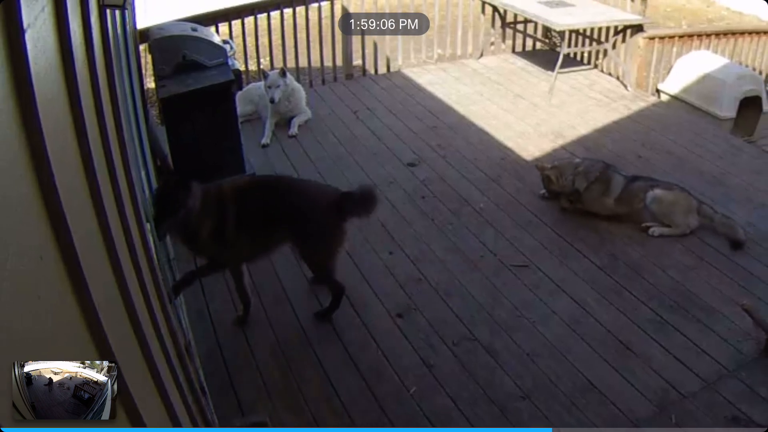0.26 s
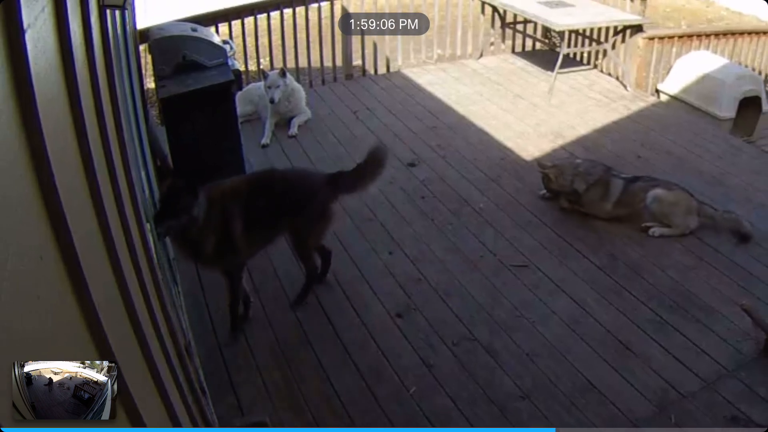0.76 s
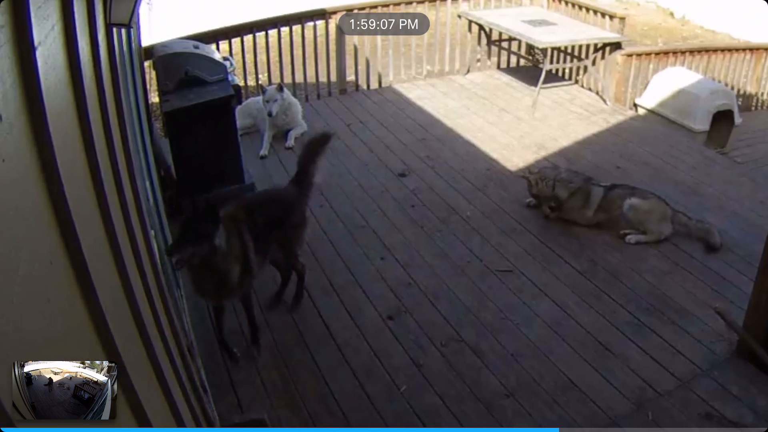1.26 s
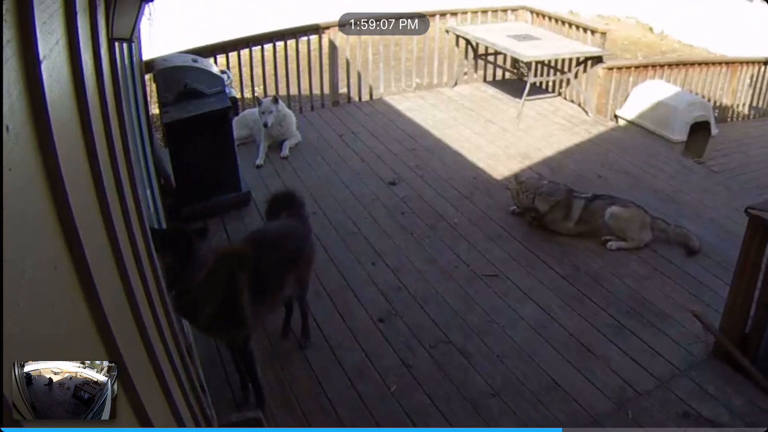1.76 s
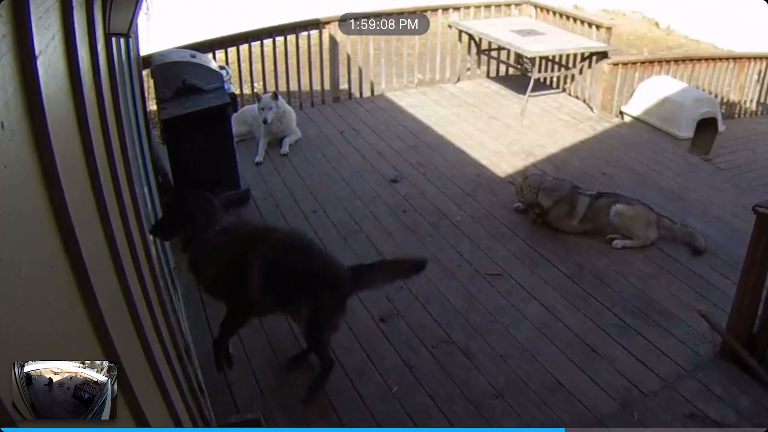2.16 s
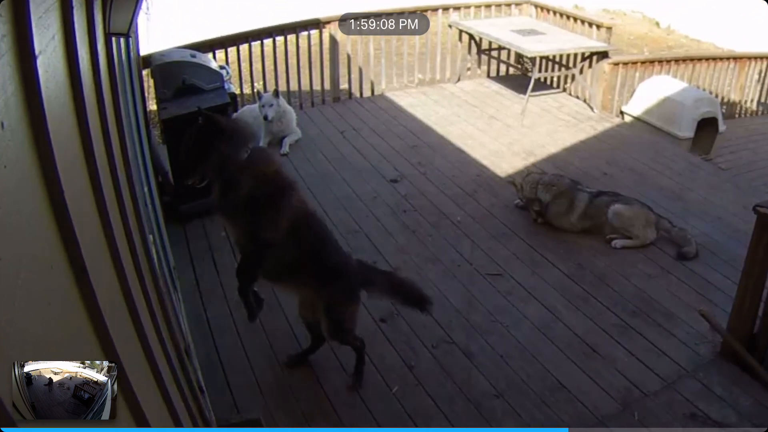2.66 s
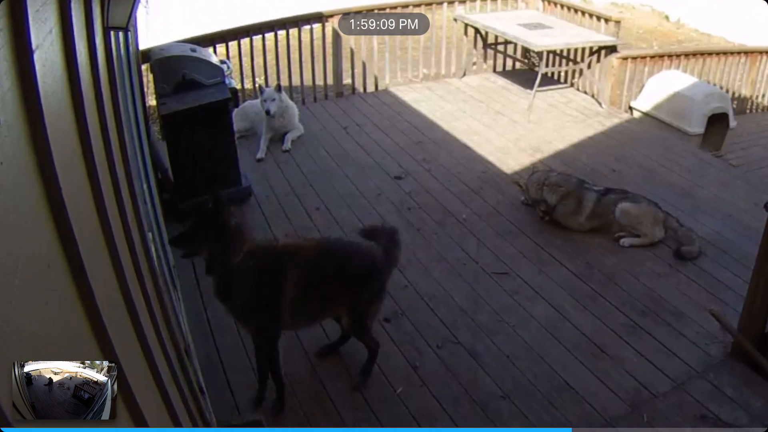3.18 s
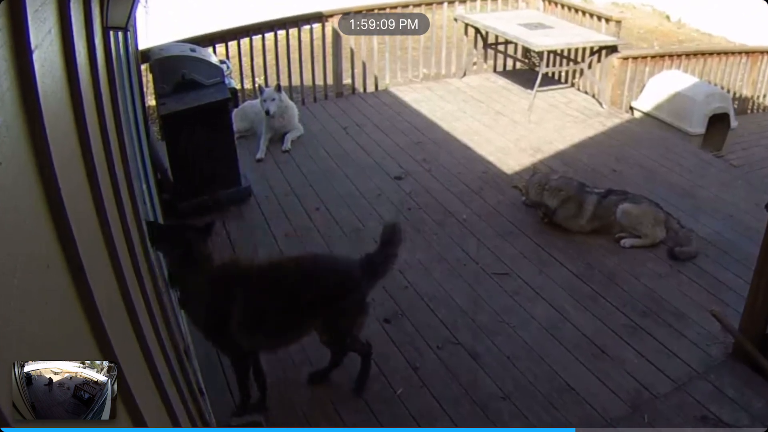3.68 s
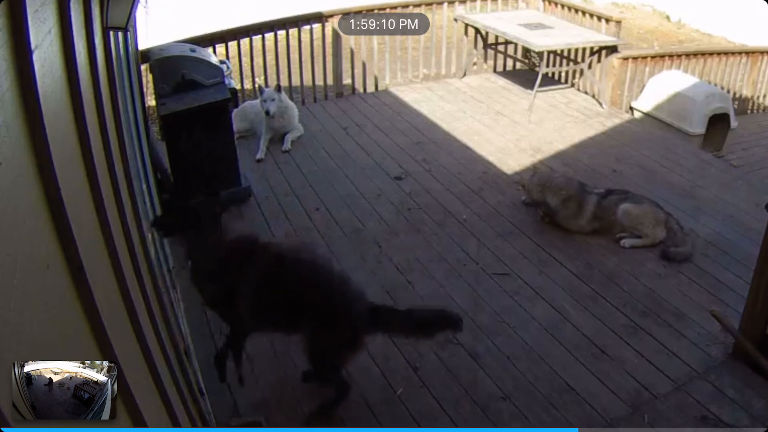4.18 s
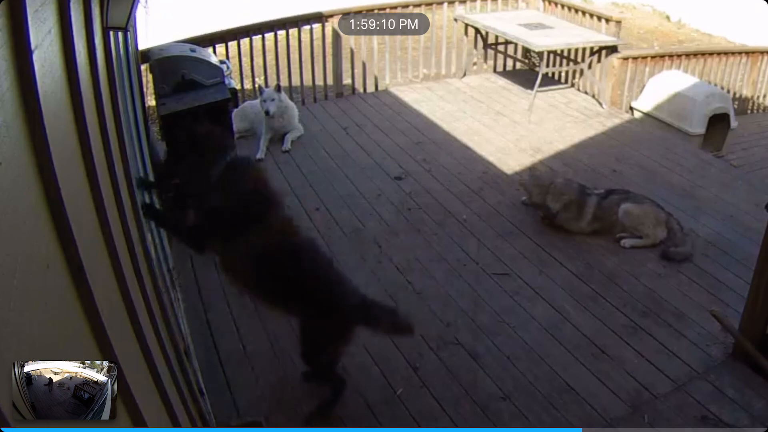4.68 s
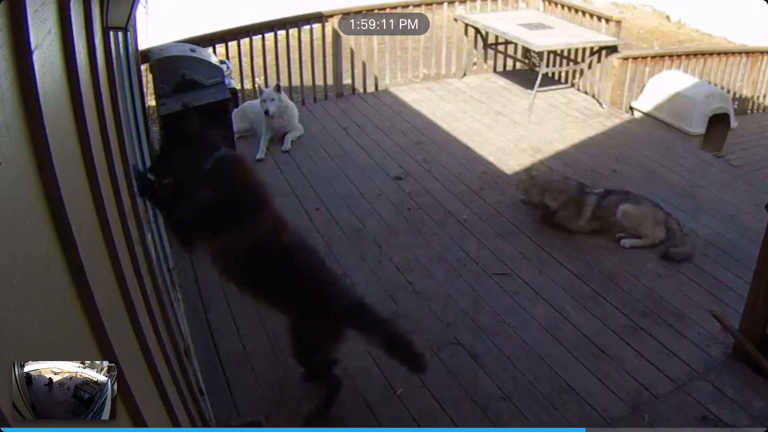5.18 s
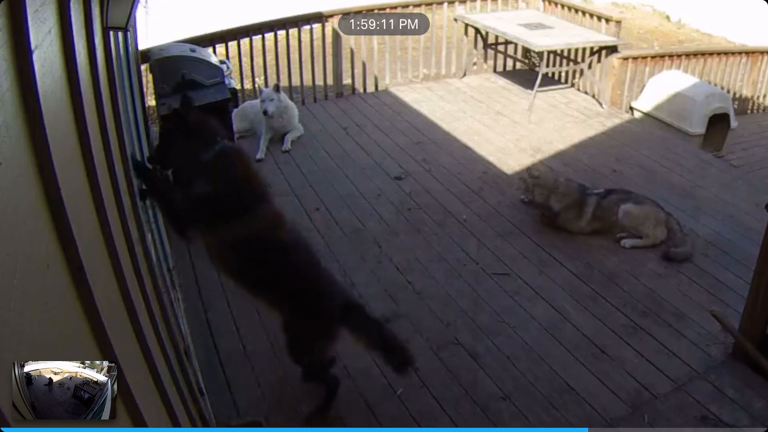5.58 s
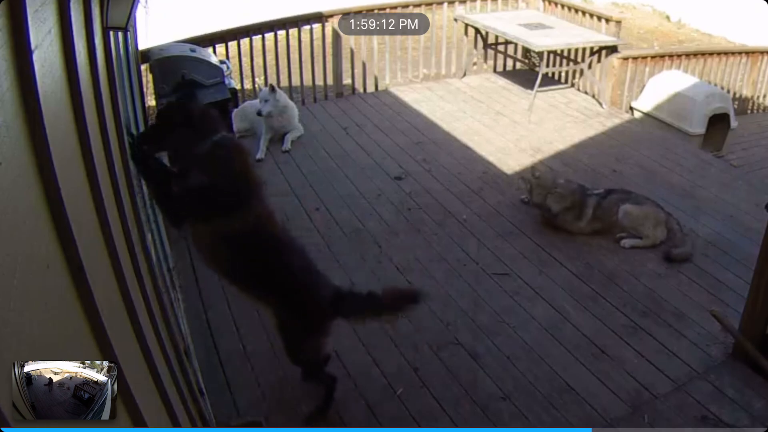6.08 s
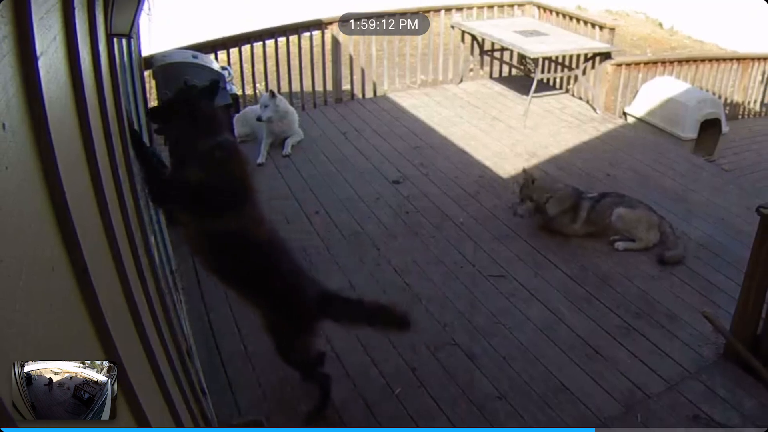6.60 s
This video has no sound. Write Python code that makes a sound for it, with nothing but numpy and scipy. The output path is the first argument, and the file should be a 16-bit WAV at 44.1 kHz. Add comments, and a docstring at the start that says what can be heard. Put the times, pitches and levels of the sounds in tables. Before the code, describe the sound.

Claws strike glass and frame at once with a knock, then lighter footfalls patter on hollow boards. A dense, uneven run of heavy thumps and clicks follows, a short pause, then repeated ringing scrapes on the pane with fewer thuds and one tiny rising squeak. Quiet open air lies behind, heard through a small outdoor microphone with muffled treble.

```python
"""Paws of a dog jumping at a glass sliding door: short rumbling thumps from modes of deck boards and frame.
Claws tick and skid on the pane: grains of friction drive its rings, a knock, a door thud and brief squeaks.
Once a short rising tone squeaks, perhaps a pad slipping on glass.
A faint outdoor hush of coloured noise lies below; a small wall-mounted microphone dulls the top."""
import sys
import numpy as np
from scipy import signal
from scipy.fft import rfft, irfft
from scipy.io import wavfile

SR = 44100
rng = np.random.default_rng(int(sys.argv[2]) if len(sys.argv) > 2 else 0)


def output_pcm(signal):
    """Save a mono or channel-first signal as 16-bit PCM at the path in sys.argv[1].

    Samples are clipped to [-1, 1] before scaling.
    """
    pcm = np.clip(np.atleast_2d(signal).T, -1, 1) * 32767
    wavfile.write(sys.argv[1], SR, np.round(pcm).astype(np.int16))


N = 301644   # samples

# claw strokes on pane and frame: t/s, drive/dB, upper ring/dB re drive, knock/dB re drive
CLAW_STROKES = [(.12, -26.5, -15.5, -7), (.2095, -34, -12, -11.5), (.264, -42.5, -17, -12),
                (0.352, -43, -5.5, -13), (.519, -33.5, -20.5, -19.5), (.894, -48.5, -22, -17),
                (1.098, -38.5, -18, -29), (1.2, -46, -20, -35), (1.222, -39.5, -16.5, -28),
                (1.234, -50, -30, -23), (1.538, -44.5, -17.5, -17.5), (1.7613, -47, -16, -12.5),
                (1.78, -44.5, -15, -29), (1.8595, -50.5, -28, -22), (1.943, -40.5, -15, -28),
                (2.034, -44, -24, -7.5), (2.066, -27, -30.5, -8), (2.112, -41.5, -15.5, -7),
                (2.151, -46, -9.5, -2.5), (2.405, -39, -21.5, -5.5), (2.411, -34, -29.5, -1.5),
                (2.558, -46.5, -15, -5), (2.598, -45, -16.5, -7.5), (2.618, -47, -23, -20),
                (2.6813, -45, -15, -9), (2.764, -45, -14, -4.5), (2.98, -45, -17.5, -28),
                (3.048, -27.5, -29, -4.5), (3.201, -40, -20, -13), (3.245, -50, -18, -13),
                (3.2907, -39.5, -13.5, -8), (3.3244, -34.5, -15.5, -25), (3.3337, -30.5, -18.5, -32),
                (3.4899, -46.5, -19, -0.5), (3.5674, -48.5, -32, -30), (3.632, -45.5, -22, -19),
                (3.768, -38.5, -20, -16.5), (4.0276, -46.5, -9, -0.5), (4.0322, -37, -19, -36),
                (4.0992, -28, -32, -8.5), (4.69, -50, -23, -21), (4.713, -47, -23, -13),
                (4.79, -36, -9, -33), (4.798, -27.5, -10, -31), (4.922, -43.5, -14.5, -23),
                (5.004, -27.5, -11, -43), (5.214, -34.5, -23.5, -27), (5.24, -38, -5.5, -9),
                (5.2925, -33, -13.5, -37), (5.41, -31.5, -12, -38), (5.523, -37.5, -13, -15),
                (5.614, -40, -17, -24), (5.6517, -33, -10, -37), (5.902, -43.5, -20.5, -17),
                (6.039, -40.5, -12.5, -16.5), (6.07, -28, -12.5, -46), (6.161, -29, -19, -22),
                (6.202, -26, -10, -46), (6.434, -42.5, -13.5, -33), (6.5073, -44, -18, -18),
                (6.567, -45.5, -14, -21), (6.645, -32, -14.5, -39), (6.745, -42.5, -13.5, -34)]
# dull low modes under boards and door: f/Hz, width/Hz, relative level/dB
THUD_MODES = [(60, 71, -3.5), (120, 68.7, -1), (171, 97, 0)]


def amp(db):
    """dB to gain."""
    return 10 ** (np.asarray(db) / 20)


def rms_one(x):
    """Scale to rms 1."""
    return x / np.sqrt(np.mean(x ** 2) + 1e-20)


def butter(x, order, hz, kind):
    """Butterworth filter."""
    return signal.sosfilt(signal.butter(order, hz, kind, fs=SR, output="sos"), x)


def flicker(rate_hz, depth_db):
    """Randomly wandering gain: low-passed noise, taken in dB."""
    r = np.exp(-2 * np.pi * rate_hz / SR)
    wander = rms_one(signal.lfilter([1], [1, -2 * r, r * r], rng.standard_normal(N)))
    return amp(depth_db * wander)


def body(drive, modes, in_step=False, wander_db=0):
    """Parallel resonances, in step or with alternating signs; unit white noise gives rms near 1."""
    out, power = 0, 0
    for k, (hz, width_hz, level_db) in enumerate(modes):
        r = np.exp(-np.pi * width_hz / SR)
        b = (1 - r * r) / 2 * np.array([1, 0, -1])
        a = [1, -2 * r * np.cos(2 * np.pi * hz / SR), r * r]
        coupled = drive * flicker(25, wander_db)   # a moving contact point couples to each mode by turns
        sign = 1 if in_step else (-1) ** k
        out = out + sign * amp(level_db) * signal.lfilter(b, a, coupled + 1e-18)
        power += amp(level_db) ** 2 * np.pi * width_hz / SR
    return out / np.sqrt(power)


def contacts(per_s, spread_db, smooth):
    """Uneven small impacts over a share of smooth friction noise; rms 1."""
    sizes = amp(spread_db * np.minimum(rng.exponential(1, N), 4)) * rng.choice([-1, 1], N)
    grains = rms_one(sizes * (rng.random(N) < per_s / SR))
    return rms_one(grains + smooth * rng.standard_normal(N))


def force(times_s, levels_db, t60s, texture, first, hold_s, tail_db=-25, tail_t60_s=0.8, swell_s=0.0026):
    """Each blow: one sharp contact, then a shudder that swells, holds and dies over a faint tail."""
    strength, sharp = np.zeros(N), np.zeros(N)
    t = np.arange(SR // 2) / SR
    tail = amp(tail_db - 60 * t / tail_t60_s)
    for s, level_db, t60, crack in zip(times_s, levels_db, t60s, np.broadcast_to(first, len(times_s))):
        at = int(s * SR)
        decay = amp(-60 * np.maximum(t - hold_s, 0) / max(t60, .01))
        shape = decay * (1 - np.exp(-t / swell_s))
        blow = amp(level_db) ** 2 * (shape ** 2 + tail ** 2)
        strength[at:at + len(t)] += blow[:N - at]   # overlaps add in power
        sharp[at] += crack * amp(level_db)
    return np.sqrt(strength) * texture + sharp


def hush():
    """Distant noise, coloured by deck and microphone; its treble flickers."""
    # noise spectrum: f/Hz, relative density/dB
    spectrum = [(15, -56.5), (25, -33), (168, -15), (514, -3.5), (622, -6.5), (668, -2), (718, -10),
                (1030, -19.5), (1860, -19.5), (2050, -15.5), (4940, -25), (5300, -23.5), (7400, -36),
                (9620, -66), (16300, -120)]
    level_db = -59
    points = np.array(spectrum)
    hz = np.maximum(np.fft.rfftfreq(N, 1 / SR), 1)
    colour = amp(np.interp(np.log(hz), np.log(points[:, 0]), points[:, 1]))
    even = rms_one(irfft(rfft(rng.standard_normal(N)) * colour, N))
    treble = butter(even, 2, 3000, "high")
    return amp(level_db) * ((even - treble) * flicker(14, 1.7) + treble * flicker(70, 5.46))


def rub():
    """Short wavering tone that climbs, loudest early; perhaps a pad slipping on glass."""
    start_s, length_s, level_db = 5.706, .056, -41
    from_hz, to_hz = 480, 770
    along = np.clip((np.arange(N) / SR - start_s) / length_s, 0, 1)
    phase = 2 * np.pi * np.cumsum(from_hz + (to_hz - from_hz) * along) / SR
    swell = np.sin(np.pi * along ** .6)
    return amp(level_db) * swell * flicker(90, 5) * np.sin(phase)


def squeaks():
    """A claw that sticks and slips keeps one mode of the pane singing: gated noise into a resonance."""
    # claw drags: start/s, end/s, level/dB
    drags = [(0.217, 0.272, -45), (0.533, 0.615, -58), (1.24, 1.287, -72), (3.353, 3.402, -50.5)]
    # pane mode: f/Hz, width/Hz, relative level/dB
    singing_mode = [(3720, 53, 0)]
    t, drag = np.arange(N) / SR, 0
    for start_s, end_s, level_db in drags:
        drag = drag + amp(level_db) * ((t > start_s) & (t < end_s))
    return body(drag * rng.standard_normal(N), singing_mode)


def ticks():
    """Claw tips on hard surfaces: bright, short scratches with little ring."""
    # scratches: t/s, drive/dB, t60/s
    tips = [(.125, -39, .1), (.2103, -36.5, 0.12), (.2635, -47, 0.24), (0.359, -37.5, .12),
            (.376, -34.5, 0.074), (.521, -44, .24), (.5955, -46, 0.092), (.6414, -35, 0.053),
            (.9014, -43.5, .064), (1.044, -38.5, .035), (1.1084, -35, 0.1), (1.2331, -46, .063),
            (1.4686, -43.5, .11), (1.5434, -47, .1), (1.7563, -43, .051), (1.8795, -49, 0.055),
            (2.0327, -33, 0.031), (2.111, -39, 0.11), (2.1545, -43.5, 0.21), (2.2914, -38.5, 0.067),
            (2.4094, -42, 0.13), (2.458, -42, .11), (2.513, -40.5, .12), (2.5561, -29, 0.029),
            (2.5865, -43, .1), (2.601, -36, .16), (2.681, -39.5, 0.22), (2.7567, -35.5, 0.14),
            (3.0594, -44.5, 0.14), (3.1258, -46, .078), (3.1652, -46, 0.088), (3.2015, -35.5, 0.091),
            (3.246, -42, .083), (3.291, -33.5, .11), (3.385, -35.5, 0.072), (3.493, -31.5, .044),
            (3.5668, -46, .1), (3.63, -27.5, 0.019), (3.897, -42, 0.35), (3.935, -47, 0.15),
            (4.0233, -36.5, .1), (4.0387, -38, 0.12), (4.1545, -45.5, .3), (4.799, -36, .22),
            (5.007, -37, 0.15), (5.1286, -39, 0.13), (5.298, -38, .11), (5.525, -41, .059),
            (5.657, -49, 0.34), (6.0706, -37, 0.11), (6.111, -42, 0.18), (6.1619, -48, .13),
            (6.21, -36.5, 0.094), (6.5131, -44.5, 0.1)]
    # broad scratch modes: f/Hz, width/Hz, relative level/dB
    scratch_modes = [(4440, 2800, -14.5), (5250, 240, 9.5), (7050, 5600, 5.5)]
    with_claw_db = -11.5   # every stroke on the pane also ticks faintly, re its drive
    with_claws = [(s, db + with_claw_db, .1) for s, db, *_ in CLAW_STROKES]
    s, drive_db, t60_s = np.transpose([*tips, *with_claws])
    grit = contacts(per_s=1300, spread_db=6.5, smooth=0.7)
    scratch = force(s, drive_db, t60_s, grit, first=9.9, hold_s=0.0015,
                    tail_db=-23.5, tail_t60_s=0.27, swell_s=0.00079)
    return butter(amp(-9.0) * body(scratch, scratch_modes), 2, 3900, "high")


def claws():
    """Skidding claws drive the pane's two bright rings, a knock below and a thud of the door."""
    # pane modes, main ring: f/Hz, width/Hz, relative level/dB
    pane_main = [(2114, 303, -10.5), (2265, 137, -2), (2510, 119, 2), (2674, 69, 3), (2813, 230, -3.5),
                 (3300, 330, -12.5)]
    # pane modes, upper ring: f/Hz, width/Hz, relative level/dB
    pane_upper = [(3450, 75, -6.5), (3637, 45, -3.5), (3735, 55, -2), (4040, 250, -11), (4390, 540, -16)]
    # knock modes below the rings: f/Hz, width/Hz, relative level/dB
    knock_modes = [(1130, 370, -6.5), (1446, 630, -6), (1697, 690, -1.5), (1865, 110, 0.5)]
    door_thud_db = -17   # knocks on the frame shake the whole door, re knock
    s, drive, upper, knock = np.transpose(CLAW_STROKES)
    base_t60_s = .15 - 0.008 * (drive + 30)   # light strokes drag on longer
    crack = 29.2 * amp(0.29 * knock)   # re skid; hard knocks crack, glancing strokes do not
    skid = contacts(per_s=1200, spread_db=4.5, smooth=0.73)

    def tap(db, quicken, tail_db):
        """Skid force with the decay shortened by quicken."""
        return force(s, db, base_t60_s / quicken, skid, first=crack, hold_s=0.012,
                     tail_db=tail_db, swell_s=0.002)

    pane = (amp(-8.5) * body(tap(drive, 0.85, -15), pane_main, wander_db=3.0)
            + amp(0.5) * body(tap(drive + upper, 0.81, -20.0), pane_upper, wander_db=2.5)
            + amp(-1.5) * body(tap(drive + knock, 1.28, -43.0), knock_modes, wander_db=4.5))
    door = body(tap(drive + knock + door_thud_db, 1.7, -29.5), THUD_MODES)
    # the thick pane keeps its sound to the middle range
    return butter(door, 2, 30, "high") + butter(pane, 3, [1000, 5500], "band")


def paws():
    """Boards ring in three groups of modes over a dull thud; the landing spot sets their balance."""
    # landings: t/s, drive/dB, deep ring/dB re drive, high ring/dB re drive, base shudder t60/s
    landings = [(.04, -44.5, 1, -18, 0.083), (.121, -22.5, -20, -16, 0.34), (.293, -31, -4, -27, 0.21),
                (.353, -32, -12, -36, 0.23), (.378, -19.5, -36, -36, 0.13), (.523, -32.5, -24, -30, 0.25),
                (.575, -38, -12.5, -10, 0.22), (.639, -34, -13, -3, 0.32), (.77, -34.5, -29, -14, 0.15),
                (.901, -24, -12.5, -19, 0.12), (.975, -34.5, -12, -7.5, .2), (.994, -25, -14.5, -15, 0.21),
                (1.044, -34, -9.5, -23, 0.22), (1.111, -38.5, 5, -11, .12), (1.179, -46, -3.5, -20, 0.47),
                (1.303, -38.5, -9.5, -26, .15), (1.44, -34, -27, -6, 0.28), (1.467, -36, -11, 4, 0.18),
                (1.534, -32.5, -17.5, -11, 0.23), (1.585, -37, -26, 1.5, 0.14),
                (1.665, -45, -18, -16, 0.095), (1.774, -37.5, -11, -12, .13), (1.795, -31, -12.5, -27, .17),
                (1.881, -38.5, -13.5, -6, 0.64), (2.035, -27, -5.5, -21, 0.14),
                (2.066, -14, -17.5, -22, .22), (2.111, -12.5, -19, -6, 0.14),
                (2.157, -20, -15.5, -36, 0.18), (2.284, -27, -18, -11, 0.18), (2.41, -30, -23, -9, 0.2),
                (2.447, -26, -23, -7, 0.33), (2.556, -16, -40, -5, .28), (2.586, -18.5, -19.5, -29, 0.17),
                (2.601, -18.5, -19.5, -20, 0.29), (2.681, -17.5, -15, -28, 0.22),
                (2.758, -24, -15, -12, .2), (2.767, -13, -20, -12, .2), (2.897, -33, -10, -8, .41),
                (2.967, -31, -34, -39, 0.82), (3.048, -16.5, -19, -36, 0.26), (3.117, -36, -21, -7, .2),
                (3.165, -30.5, -10.5, -20, 0.17), (3.202, -17, -37.5, -9.5, 0.28),
                (3.248, -16, -15, -13, 0.09), (3.294, -19, -14, -8.5, 0.28), (3.387, -10.5, -15, -7.5, .13),
                (3.493, -20, -16, -5, 0.12), (3.63, -26, -17, -41, 0.18), (3.753, -39, -13, -27, .2),
                (3.771, -33.5, -13.5, -31, 0.24), (3.892, -26.5, -35.5, -13.5, 0.37),
                (3.912, -21.5, -22, -18, .37), (4.015, -32, -31, -9, 0.25),
                (4.038, -27.5, -5.5, -8.5, 0.31), (4.099, -18, -15.5, -15, .2),
                (4.112, -17, -16.5, -15, 0.19), (4.168, -26, -27.5, -12.5, 0.31),
                (4.381, -43.5, -6.5, -37, .1), (4.727, -34, -9.5, -39, 0.19), (4.802, -35, -19.5, -19, .15),
                (4.823, -37.5, -20, -22, .31), (4.918, -38.5, -15.5, -22, 0.56),
                (4.966, -12.5, -21.5, -34, .08), (4.984, -21, -19, -31, 0.22), (5.01, -13, -17, -40, .16),
                (5.121, -32.5, -7.5, -2, 0.42), (5.195, -47, -1, -5, .21), (5.253, -40, -21, -7, 0.64),
                (5.282, -23.5, -13.5, -33, .11), (5.34, -25, -12.5, -36, 0.12),
                (5.423, -41.5, -23, -19, .6), (5.686, -37, -28, -17, 0.18), (5.717, -37, -33, -11.5, 0.34),
                (6.041, -41, -14.5, -5, 0.49), (6.087, -40.5, -29, -5, .1), (6.463, -24, -15, -37, 0.12),
                (6.576, -37.5, -23, -25, 0.14), (6.67, -39.5, -23, -14.5, 0.096)]
    # deep board modes: f/Hz, width/Hz, relative level/dB
    boards_deep = [(250, 35, -20.5), (313.4, 30, -4), (352, 53.6, 5.5), (409.3, 35, -17.5)]
    # main board modes: f/Hz, width/Hz, relative level/dB
    boards_main = [(453.6, 19, -8), (515, 35, 1.5), (549.8, 31.3, -2.5), (590.2, 12.5, -2.5)]
    # high board modes: f/Hz, width/Hz, relative level/dB
    boards_high = [(657, 16, 8), (696.6, 44, 22), (710, 120, -10.5), (852, 40, -35)]
    s, drive, deep, high, base_t60_s = np.transpose(landings)
    thud_drive = -41.5 + 0.47 * drive   # dB; the thud grows by a share of the landing's dB
    shudder = contacts(per_s=350, spread_db=2.0, smooth=0.93)

    def blow(db, quicken):
        """Landing force with the shudder shortened by quicken."""
        return force(s, db, base_t60_s / quicken, shudder, first=16.96, hold_s=0.0063, tail_db=-23.5)

    boards = (amp(-12.5) * body(blow(drive, 1.49), boards_main, in_step=True, wander_db=0.5)
              + amp(-2.5) * body(blow(drive + deep, 0.74), boards_deep, in_step=True)
              + amp(-5) * body(blow(drive + high, 2.37), boards_high, in_step=True, wander_db=1.5))
    soft = butter(boards, 9, 840, "low")   # pads are soft
    soft = butter(soft, 4, 240, "high")   # narrow boards radiate little bass
    weight = butter(body(blow(thud_drive, 0.93), THUD_MODES), 2, 30, "high")
    return soft + amp(3.0) * weight


def scene():
    """Paws, claws, squeaks and the hush, in one channel."""
    return (hush() + rub() + squeaks() + ticks() + claws() + paws())[None]


def record(dry):
    """The microphone fades in the top treble, the top is cut, a trace of converter hiss remains."""
    fade_hz, cutoff_hz, hiss_db = 6700, 8250, -104
    dulled = butter(dry, 11, fade_hz, "low")
    cut = signal.sosfilt(signal.cheby2(10, 36, cutoff_hz, fs=SR, output="sos"), dulled)
    return cut + amp(hiss_db) * rng.standard_normal(dry.shape)


dry = scene()
out = record(dry)
output_pcm(out)
```